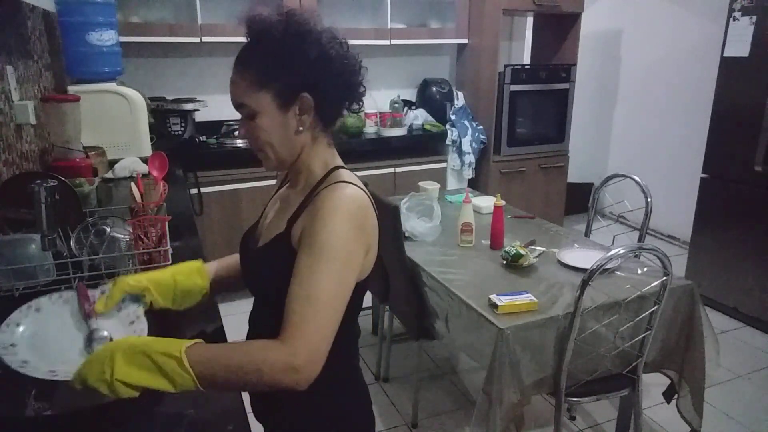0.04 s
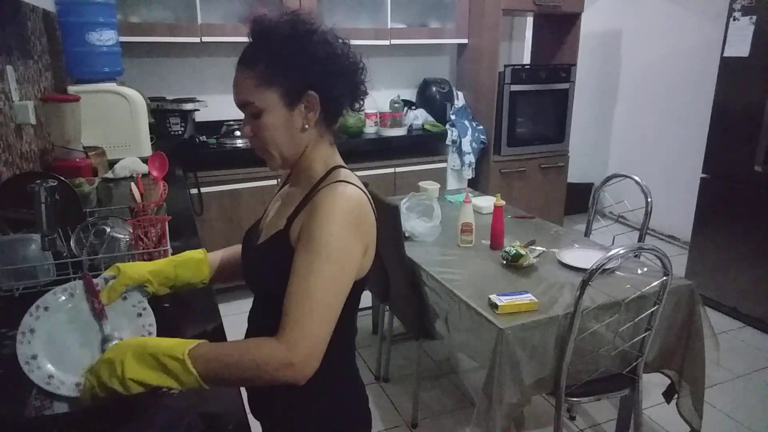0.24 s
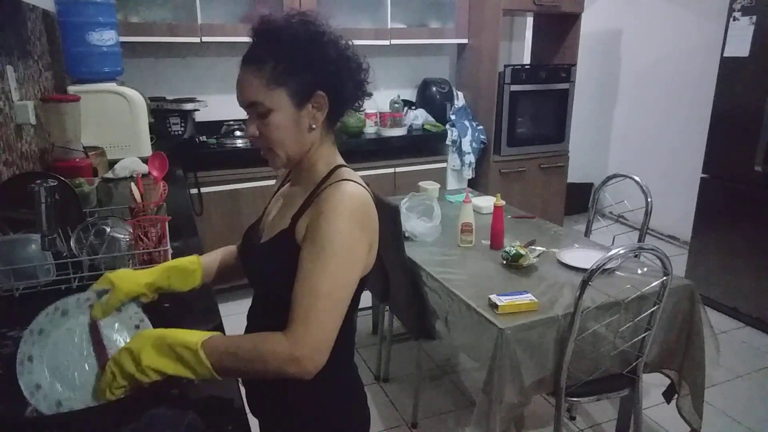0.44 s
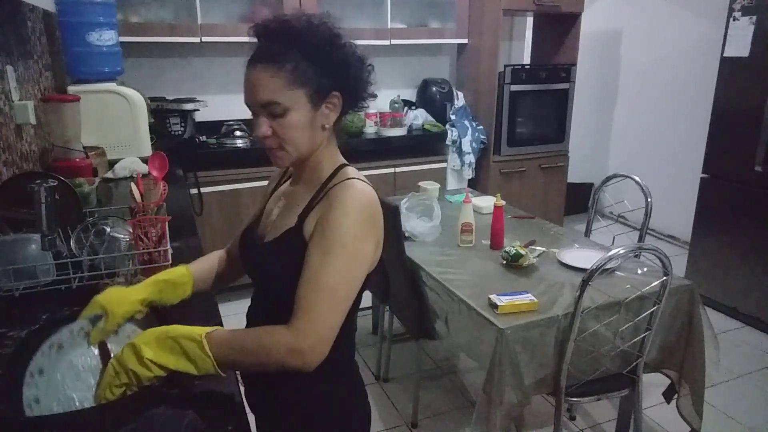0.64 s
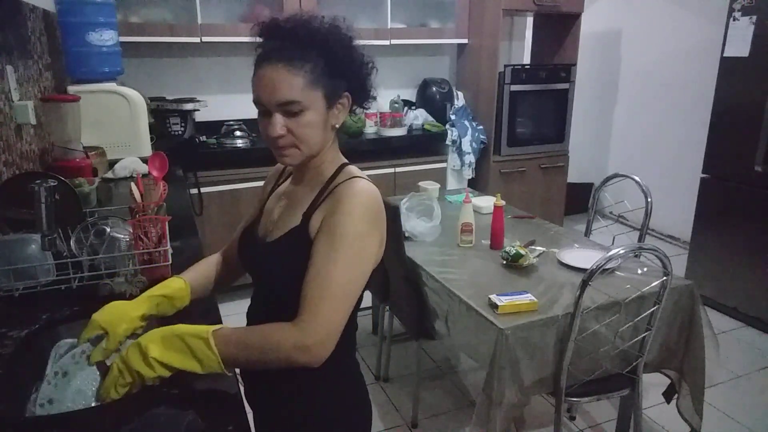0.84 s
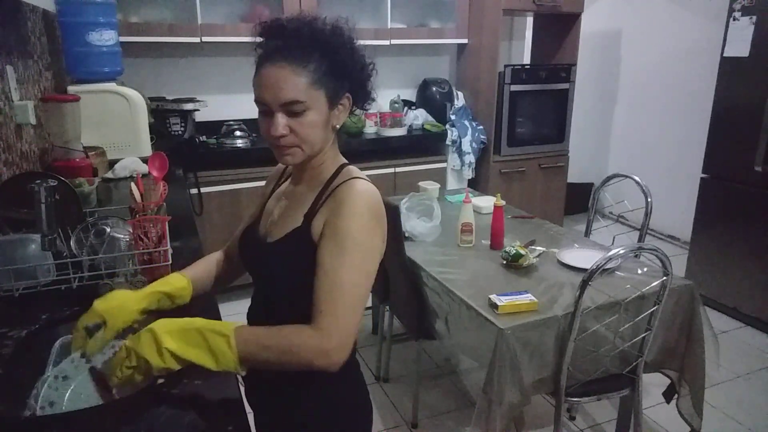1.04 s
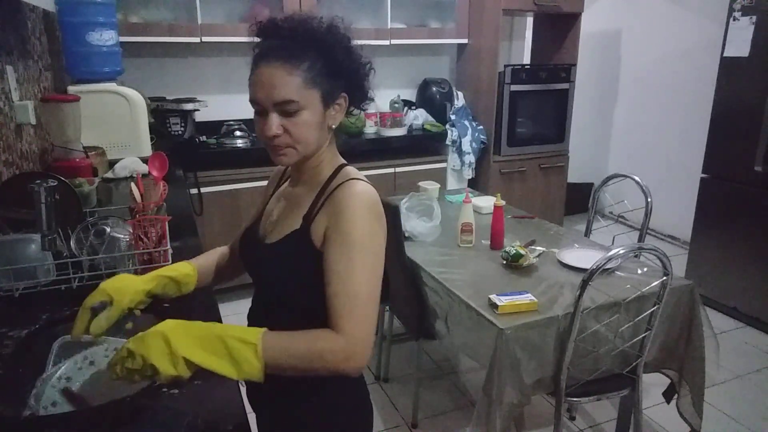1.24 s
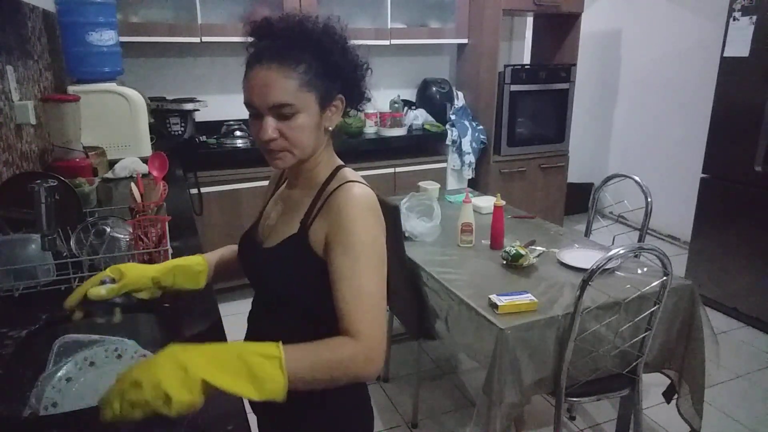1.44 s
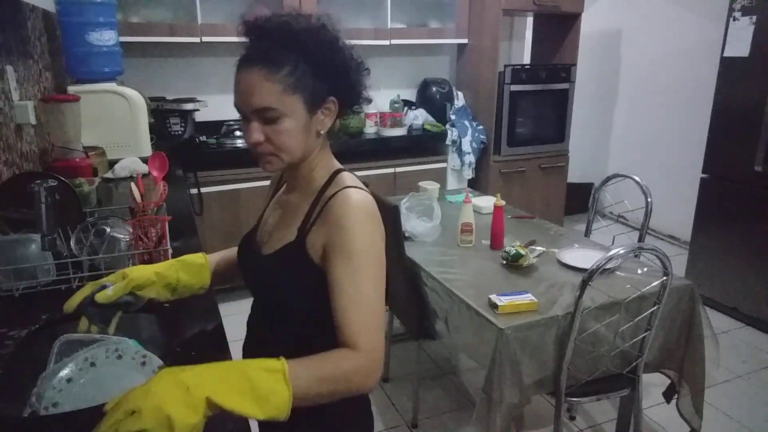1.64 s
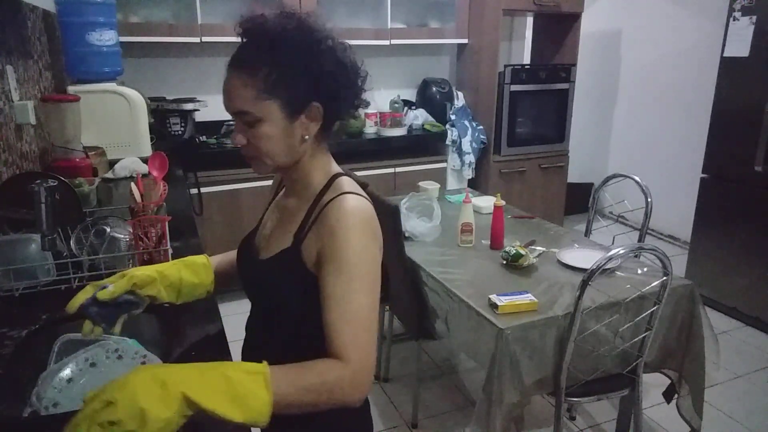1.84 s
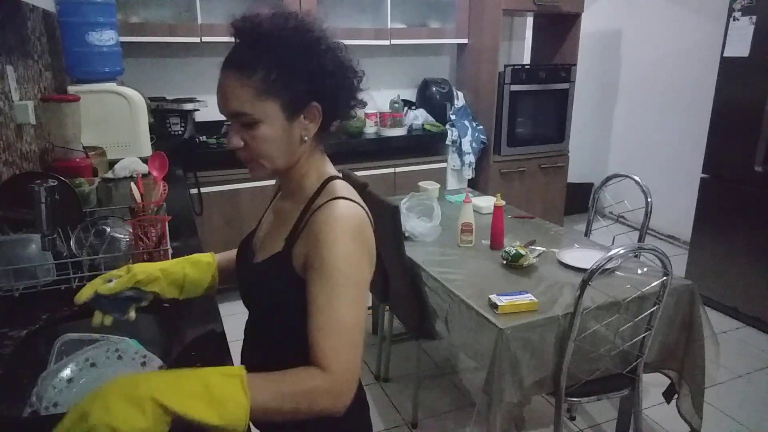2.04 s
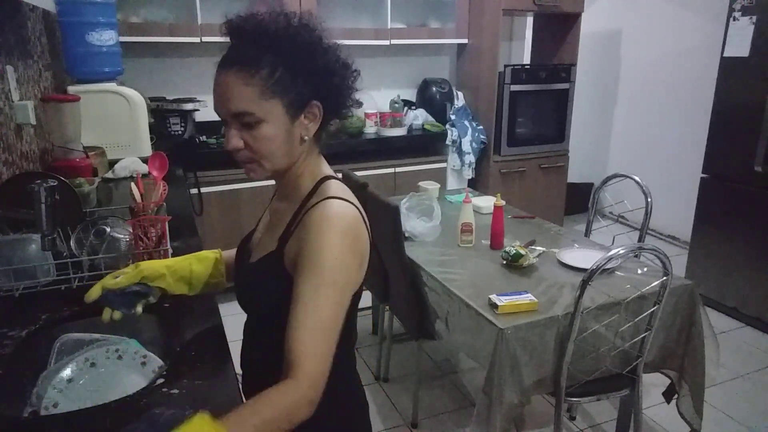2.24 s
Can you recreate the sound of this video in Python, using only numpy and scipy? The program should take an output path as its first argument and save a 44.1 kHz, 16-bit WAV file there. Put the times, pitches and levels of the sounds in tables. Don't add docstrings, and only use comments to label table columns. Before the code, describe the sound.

Plates, a bowl, cups and cutlery knock together in a metal sink over a faint fridge hum

```python
import sys
import numpy as np
from scipy import signal
from scipy.fft import rfft, irfft
from scipy.io import wavfile
from scipy.ndimage import uniform_filter1d

SR = 44100
rng = np.random.default_rng(int(sys.argv[2]) if len(sys.argv) > 2 else 0)


def linear_from_db(decibels):
    return 10 ** (np.asarray(decibels, float) / 20)


def wav_out(sig):
    wavfile.write(sys.argv[1], SR, np.round(np.clip(np.atleast_2d(sig).T, -1, 1) * 32767).astype(np.int16))


N = 101429

# [t/s, ring level/dB, crack level/dB, chatter decay/s]
BIG_PLATE_MODES = [(317, -13, 0.21), (640, -2, 0.48), (701, -10, 0.43), (1314, -18.5, 0.6),
                   (1736, -7.5, 0.56), (1857, -11, 0.64), (2044.5, -2.5, 0.28), (2065, -14, .45),
                   (2815, -0.5, 0.34), (3068, -6, 0.36), (3726, -7, 0.41), (4704, -9, 0.46),
                   (5158, -10, 0.48), (6370, -6.5, 0.19)]
BIG_PLATE_CRACK = [(80, -50), (200, -8.5), (600, -8.5), (1200, -15.5), (3000, -9.5), (6000, -8),
                   (9500, -16.5), (15500, -17)]
BIG_PLATE_KNOCKS = [
    (0.2067, -26.5, -6.5, 0.011),
    (0.222, -13, -11, 0.014),
    (0.241, -27, -9.5, 0.018),
]
RIM_MODES = [(5840, -5, 0.18), (6420, 0, 0.083), (6804, -18, 0.089), (7192, -20, 0.69), (8700, 4, 0.3),
             (10190, -23, 0.31), (10750, -57, 5.0), (11370, -19, 0.39), (12900, -8, 0.12),
             (13100, -22, 0.3), (13600, -17, 0.29), (13920, -19, 0.35), (15420, -13, 0.14)]
RIM_KNOCKS = [
    (0.2065, -20, -24, 0.01),
    (0.435, -36, -32, 0.01),
    (1.174, -45, -37, .005),
]
SAUCER_MODES = [(700, -17, 0.27), (2826, -7, 0.24), (2856, -9, 0.37), (3050, -8, 0.3), (4250, -4, 0.083),
                (4345, 1, 0.4), (4410, 0.5, 0.37), (4820, -4, 0.32), (5080, -3, 0.36), (5680, -7, 0.21),
                (6470, -4, 0.26), (6850, -5, 0.18), (8540, 2, 0.22), (10900, -11, .15)]
SAUCER_CRACK = [(80, -46), (250, -14), (700, -5.5), (1400, -11.5), (4000, -4.5), (7500, -12),
                (15500, -15.5)]
SAUCER_KNOCKS = [
    (0.435, -18.5, -8.5, 0.017),
    (0.455, -32, -11, 0.012),
    (0.479, -39, -16, .02),
]
BASIN_MODES = [(184, -1, 0.23), (265, -2, 0.16), (362, -10, 0.16), (406, -5, .12), (680, -12, 0.15),
               (738, -9, 0.14), (867, 2, 0.58), (963, -6, 0.14), (3055, 2.5, 0.17), (3720, -10, 0.14),
               (4320, 3, .12), (5900, -10, .1)]
BASIN_CRACK = [(80, -44.5), (200, -5.5), (800, -5.5), (1400, -11.5), (4500, -6.5), (8000, -16.5),
               (15500, -13.5)]
BASIN_KNOCKS = [
    (0.01, -57, -40, 0.0025),
    (0.068, -55, -30.5, 0.0014),
    (0.669, -40, -23.5, 0.016),
    (0.7714, -26.5, -13, 0.0043),
    (0.786, -39, -14.5, 0.0037),
    (0.797, -53, -22, 0.0047),
    (0.808, -47, -23, 0.0086),
]
BOWL_MODES = [(277, -13, 0.44), (863, -7, 0.35), (921, -8.5, 0.25), (965, -5, 0.31), (1000, -11, .15),
              (1570, 0.5, 0.11), (2314, -11, .18), (2980, -7.5, 0.23), (3530, -28, 0.085),
              (4440, -4.5, 0.087), (4700, -5, 0.13), (5230, -12, .12), (6960, -18, 0.11), (9001, -11, 0.1)]
BOWL_CRACK = [(80, -44), (600, -22), (1000, 5.5), (4500, 4), (15500, -15.5)]
BOWL_KNOCKS = [
    (1.0721, -23, -18.5, 0.0049),
    (1.094, -56, -38, 0.014),
]
PLATE_MODES = [(190, -9, 0.13), (532, 2.5, 0.11), (678, -13, 0.44), (1340, -6.5, 0.25), (1550, -11, 0.32),
               (1982, -13, 0.27), (2290, -19, .1), (3050, -1.5, 0.35), (4419, 4, 0.13), (4730, -6, 0.26),
               (5200, -6, .1), (5690, -6.5, .08), (7280, -11, 0.15), (8500, -6, .12)]
PLATE_CRACK = [(80, -22), (200, -10.5), (540, -6), (1100, -11), (2300, -5.5), (3700, -11), (4600, -7),
               (15500, -17.5)]
PLATE_KNOCKS = [
    (1.02, -39.5, -26.5, 0.0069),
    (1.049, -52, -35, .005),
    (1.173, -23.5, -12, 0.0069),
    (1.312, -50.5, -38, 0.0038),
]
CUP_MODES = [(1626, -10.5, 0.21), (1887, -28, 0.15), (2295, -12.5, 0.17), (2940, -23, 0.28),
             (3188, -2, 0.095), (3500, -12, 0.11), (3730, -5.5, .08), (4200, -14, 0.17), (4620, -14, 0.21),
             (5190, 0, 0.11), (5730, -1, .04), (8600, -15, 0.17), (10670, -20, 0.18), (12200, -13, 0.067)]
CUP_CRACK = [(80, -40), (190, -12), (600, -14.5), (1100, -17.5), (1800, -6.5), (5000, -9), (7000, -13.5),
             (15500, -20)]
CUP_KNOCKS = [
    (1.425, -43, -30.5, 0.011),
    (1.4854, -23, -15, 0.0037),
    (1.4885, -19.5, -10.5, 0.0046),
    (1.498, -37, -19, .003),
]
CUP_LOW_MODES = [(204, -13.5, 0.31), (1141, -11, 0.27), (1316, 4, 0.14)]
CUP_LOW_KNOCKS = [
    (1.508, -22.5, -22, 0.016),
]
FORK_MODES = [(2320, -8, 0.17), (3085, -10, 0.3), (3230, -10, 0.066), (4146, -8, 0.25), (4280, -10, .2),
              (4600, -10, .15), (5230, -6, 0.12), (6342, -10, 0.22), (7300, -12, 0.13)]
FORK_CRACK = [(100, -13), (350, -5), (1000, -4.5), (2300, -3.5), (4500, -4.5), (15500, -11)]
FORK_KNOCKS = [
    (1.592, -26, -12.5, 0.0032),
    (1.839, -39, -26.5, 0.0061),
]
SPOON_MODES = [(7300, 0, .14), (8300, -16, .05)]
SPOON_CRACK = [(2000, -38), (8000, -3.5), (15500, -13)]
SPOON_KNOCKS = [
    (0.93, -66, -31, .003),
    (2.001, -49, -46, .005),
]
BASIN_PING_MODES = [(4330, -11, 0.02), (5240, 3, 0.027), (7200, -13, 0.026)]
BASIN_PING_KNOCKS = [
    (0.762, -11.5, -13, 0.0033),
]
# [t/s, level/dB, half length/s, f/Hz]
RUBS = [
    (0.044, -45, 0.01, 13800),
    (0.686, -15, 0.01, 4180),
    (1.848, -26.5, 0.006, 3430),
    (2.01, -57, 0.012, 13000),
    (2.038, -47, 0.024, 4970),
    (2.29, -48, 0.034, 4020),
]
# [t/s, f/Hz, level/dB, rise/s, fall/s]
BOOMS = [
    (0.775, 100.5, -26, 0.031, 0.022),
    (1.151, 102, -37.5, 0.038, 0.011),
    (1.872, 100, -25, 0.028, 0.02),
]
# [f/Hz, t60/s]
KITCHEN_T60 = [(150, 0.75), (600, 0.86), (2000, 0.91), (5000, 0.6), (10000, 0.44), (15000, 0.39)]
# [f/Hz, level/dB, wander/dB]
HUM = [(51.4, -48.5, 2), (99.1, -45, 1.5)]
# [f/Hz, level/dB]
AIR = [(45, -17), (125, 1.5), (250, -6.5), (500, -18.5), (1200, -28), (4000, -25.5), (8000, -30),
       (15500, -39)]


def read(table, hz):
    table = np.array(table, float)
    return np.interp(np.log(np.maximum(hz, 1)), np.log(table[:, 0]), table[:, 1])


def unit(x):
    return x / np.sqrt(np.mean(x ** 2))


def unit_energy(h):
    return h / np.sqrt(np.sum(h ** 2))


def colour(x, table):
    size = 2048
    level_db = read(table, np.fft.rfftfreq(size, 1 / SR))
    cepstrum = irfft(np.log(linear_from_db(level_db)))
    cepstrum[1:size // 2] *= 2
    cepstrum[size // 2 + 1:] = 0
    h = irfft(np.exp(rfft(cepstrum)))
    return signal.fftconvolve(x, unit_energy(h))[:len(x)]


def walk(rate_hz):
    hold = int(SR / rate_hz)
    steps = np.repeat(rng.standard_normal(N // hold + 1), hold)
    slewed = uniform_filter1d(uniform_filter1d(steps, hold), hold)
    return unit(slewed[:N])


def grit(spike_db, norm):
    return rng.standard_normal(N) * linear_from_db(spike_db * rng.exponential(size=N)) / norm


def mode_ring(modes):
    longest_ring_s, ring_knee_hz, flutter_db = 0.6, 4500, 4
    t = np.arange(SR // 2) / SR
    hz, db, t60_s = np.array(modes, float).T[:, :, None]
    t60_s = np.clip(t60_s, 0.02, longest_ring_s * np.minimum(ring_knee_hz / hz, 1))
    flutter = np.array([walk(55.5)[:len(t)] for _ in modes]) * flutter_db
    flutter = flutter * np.minimum(t / 0.013, 1)
    level = linear_from_db(db + flutter - 60 * t / t60_s)
    return np.sum(level * np.sin(2 * np.pi * hz * t), axis=0)


def overtone_crowd(modes):
    count, t60_s, level_db, spread = 70, 0.02, -4, 0.044
    t = np.arange(SR // 2) / SR
    hz, db, _ = np.array(modes, float).T[:, :, None]
    detune, phase, life = rng.random((count, 3)).T[:, :, None]
    near_hz = np.resize(hz, detune.shape) * (1 + spread * (detune - 0.5))
    level = linear_from_db(0.33 * np.resize(db, near_hz.shape))
    decay = linear_from_db(-60 * t / (t60_s * (0.2 + life)))
    crowd = np.sum(level * np.cos(2 * np.pi * near_hz * t + 2 * np.pi * phase) * decay, axis=0)
    crowd = unit_energy(crowd) * linear_from_db(level_db)
    crowd[0] += 1
    return crowd


def dish(modes, crack, knocks):
    t = np.arange(N) / SR
    ring, crowd = mode_ring(modes), overtone_crowd(modes)
    push, chatter = np.zeros(N), np.zeros(N)
    for at_s, ring_db, crack_db, decay_s in knocks:
        after = np.maximum(t - at_s, 0)
        fade = np.minimum(after / 0.00034, 1) * np.exp(-after / decay_s)
        contacts = fade * grit(3.27, 2.35)
        tick = np.maximum(1 - np.abs(t - at_s) * SR, 0)
        push += linear_from_db(ring_db) * tick + linear_from_db(ring_db - 35.5) * contacts
        chatter += linear_from_db(crack_db) * contacts
    ringing = signal.fftconvolve(push, ring)[:N]
    cracking = colour(signal.fftconvolve(chatter, crowd)[:N], crack)
    return np.array([ringing, cracking])


def rubs():
    t = np.arange(N) / SR
    out = np.zeros(N)
    for at_s, db, half_s, hz in RUBS:
        swell = linear_from_db(db) * np.exp(-0.5 * ((t - at_s) / half_s) ** 2)
        band = [(hz / 30, -22), (hz / 3, -9), (hz, 0), (hz * 3, -16)]
        out += colour(grit(2.05, 2.29) * swell, band)
    return out


def cabinet():
    rise_hz_per_s = 140
    t = np.arange(N) / SR
    out = np.zeros(N)
    for at_s, hz, db, rise_s, fall_s in BOOMS:
        u = t - at_s
        swell = np.exp(-0.5 * (u / np.where(u < 0, rise_s, fall_s)) ** 2)
        out += linear_from_db(db + 7) * swell * np.sin(2 * np.pi * (hz + 0.5 * rise_hz_per_s * u) * u)
    return out


def kitchen(x):
    level_db, build_s = -1.5, 0.0018
    t = np.arange(SR) / SR
    noise = rfft(rng.standard_normal(SR))
    hz = np.maximum(np.arange(SR // 2 + 1), 1.0)
    h = np.zeros(SR)
    for centre_hz in 62.5 * 2 ** np.arange(0, 9, 0.5):
        band = np.maximum(1 - 2 * np.abs(np.log2(hz / centre_hz)), 0)
        h += irfft(noise * band) * linear_from_db(-60 * t / read(KITCHEN_T60, centre_hz))
    h = h * (1 - np.exp(-t / build_s))
    return signal.fftconvolve(x, unit_energy(h))[:N] * linear_from_db(level_db)


def earlier():
    level_db, corner_hz, t60_s = -33.5, 450, 0.77
    t = np.arange(N) / SR
    band = [(80, -20), (200, 0), (corner_hz, 0), (3000, -22), (15000, -36)]
    dull = colour(rng.standard_normal(N), band)
    return dull * linear_from_db(level_db - 60 * t / t60_s + 1.1 * walk(28.0))


def fridge():
    air_db = -46.5
    t = np.arange(N) / SR
    hum = np.zeros(N)
    for hz, db, wander_db in HUM:
        level = linear_from_db(db + 3 + wander_db * walk(22))
        hum += level * np.sin(2 * np.pi * hz * t + 0.6 * walk(25))
    hiss = unit(colour(rng.standard_normal(N), AIR))
    return hum + hiss * linear_from_db(air_db + 0.43 * walk(7.75))


def scene():
    ring_echo_db = -6.5
    ring, crack = sum(dish(*d) for d in [
        (BIG_PLATE_MODES, BIG_PLATE_CRACK, BIG_PLATE_KNOCKS),
        (RIM_MODES, SPOON_CRACK, RIM_KNOCKS),
        (SAUCER_MODES, SAUCER_CRACK, SAUCER_KNOCKS),
        (BASIN_MODES, BASIN_CRACK, BASIN_KNOCKS),
        (BOWL_MODES, BOWL_CRACK, BOWL_KNOCKS),
        (PLATE_MODES, PLATE_CRACK, PLATE_KNOCKS),
        (CUP_MODES, CUP_CRACK, CUP_KNOCKS),
        (CUP_LOW_MODES, CUP_CRACK, CUP_LOW_KNOCKS),
        (FORK_MODES, FORK_CRACK, FORK_KNOCKS),
        (SPOON_MODES, SPOON_CRACK, SPOON_KNOCKS),
        (BASIN_PING_MODES, SPOON_CRACK, BASIN_PING_KNOCKS)])
    crack = crack + rubs()
    echo = kitchen(crack + linear_from_db(ring_echo_db) * ring)
    mix = ring + crack + echo + cabinet() + earlier() + fridge()
    return mix[None]


def top_cut(x):
    return signal.sosfilt(signal.butter(12, 16990, fs=SR, output="sos"), x)


def record(dry):
    top_hz, bottom_hz = 15750, 42
    low_pass = signal.ellip(10, 0.2, 60, top_hz, fs=SR, output="sos")
    high_pass = signal.butter(6, bottom_hz, "high", fs=SR, output="sos")
    x = signal.sosfilt(low_pass, np.tanh(dry))
    fade_in = np.minimum(np.arange(N) / 300, 1)
    x = signal.sosfilt(high_pass, x * fade_in)
    return top_cut(x)


dry = scene()
out = record(dry)
wav_out(out)
```